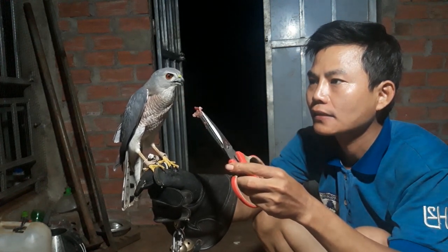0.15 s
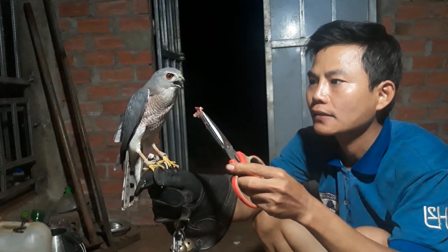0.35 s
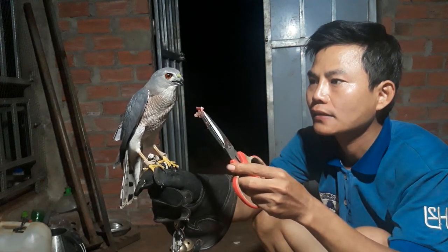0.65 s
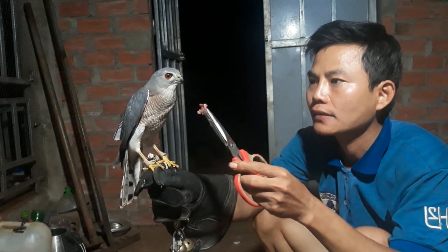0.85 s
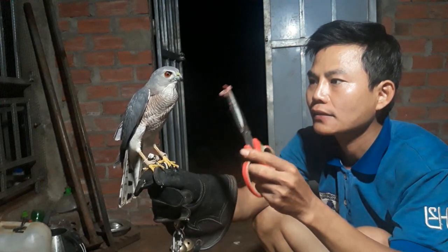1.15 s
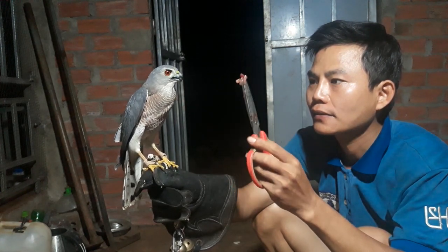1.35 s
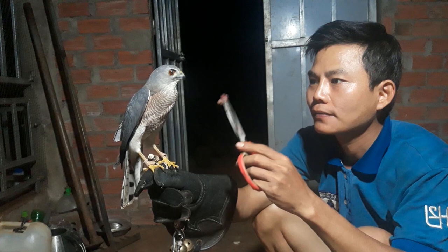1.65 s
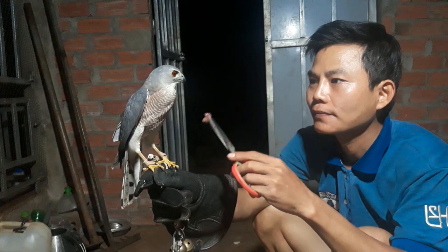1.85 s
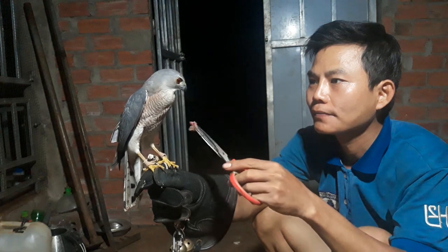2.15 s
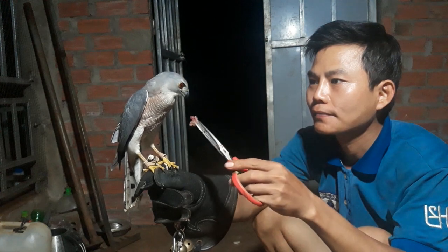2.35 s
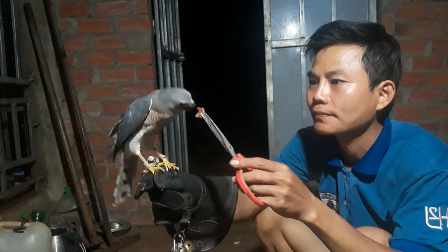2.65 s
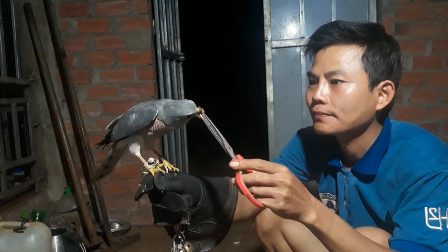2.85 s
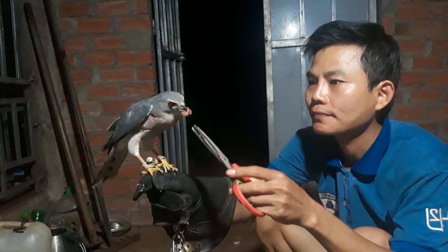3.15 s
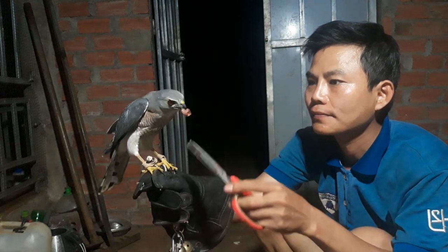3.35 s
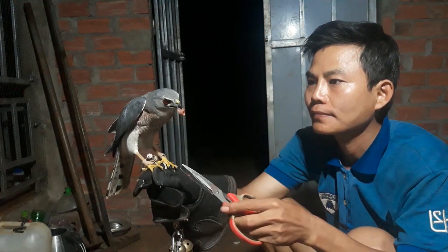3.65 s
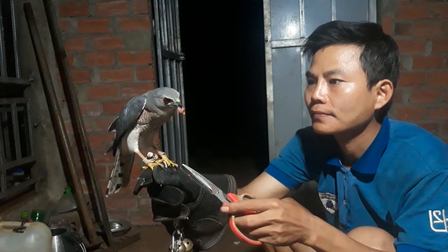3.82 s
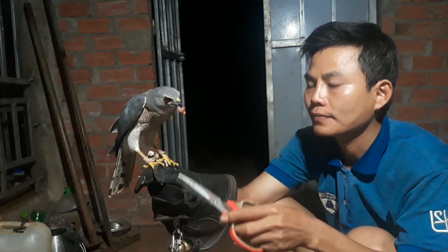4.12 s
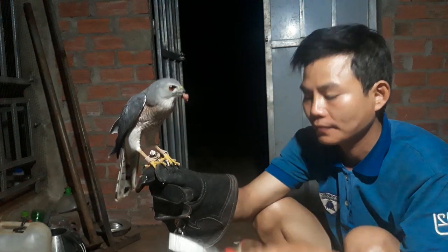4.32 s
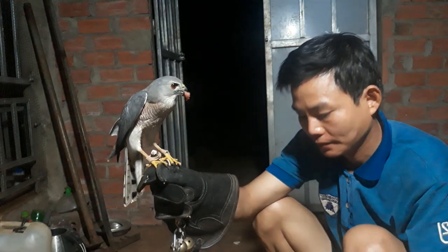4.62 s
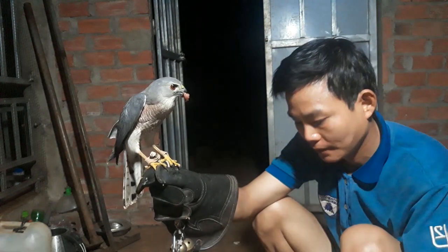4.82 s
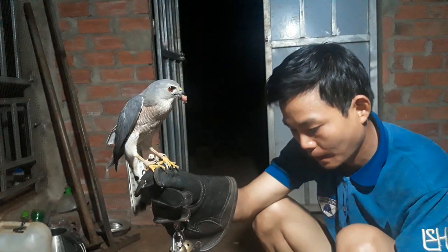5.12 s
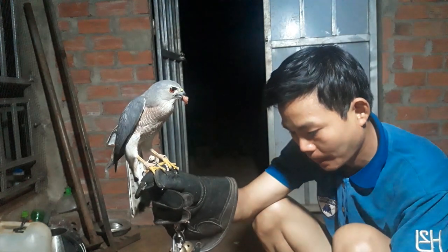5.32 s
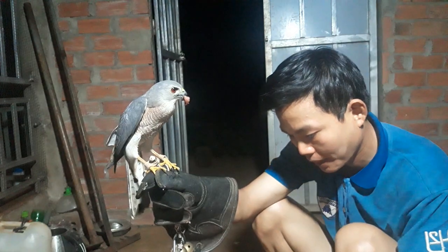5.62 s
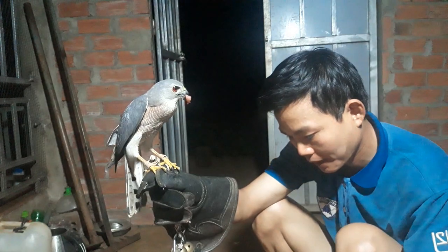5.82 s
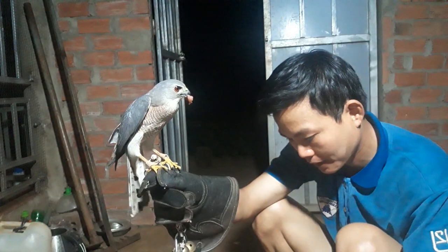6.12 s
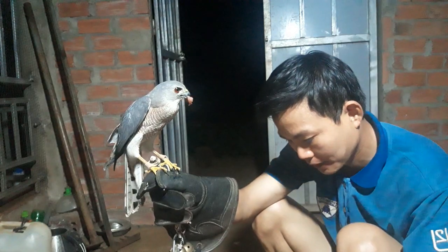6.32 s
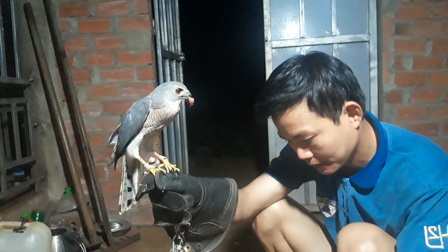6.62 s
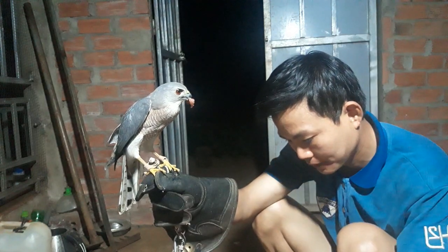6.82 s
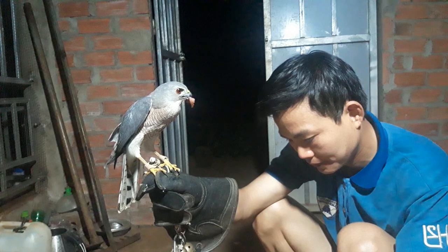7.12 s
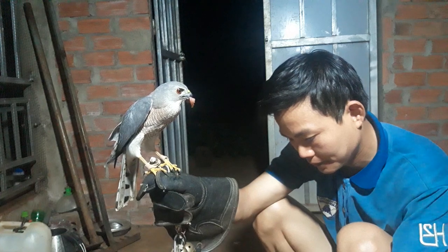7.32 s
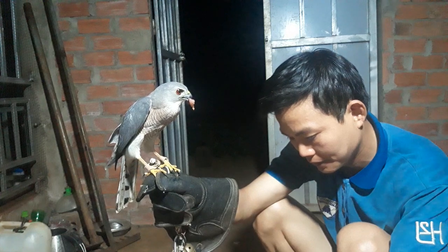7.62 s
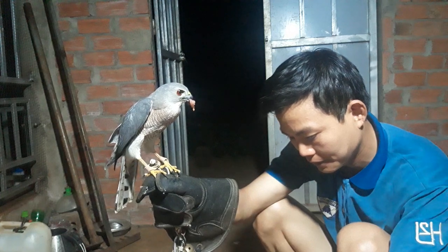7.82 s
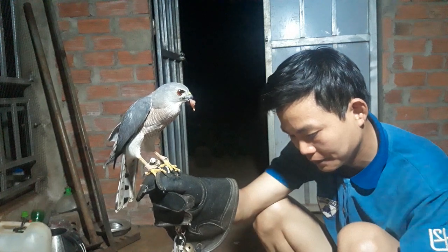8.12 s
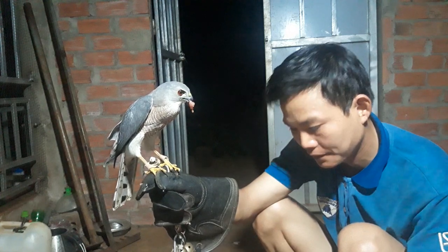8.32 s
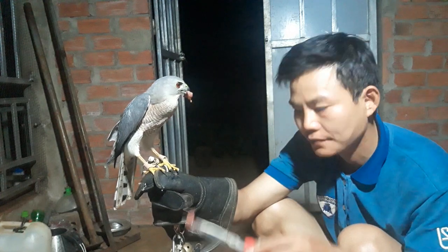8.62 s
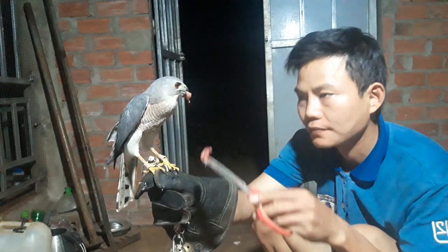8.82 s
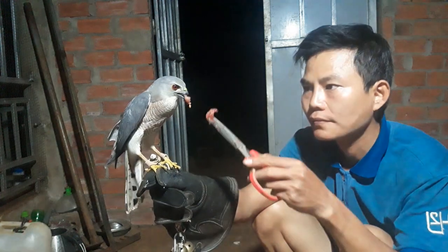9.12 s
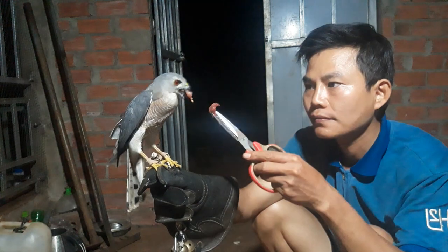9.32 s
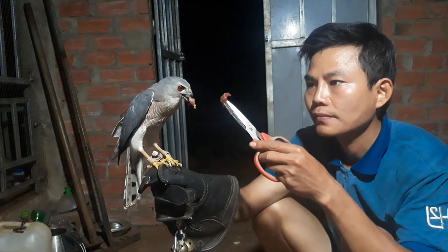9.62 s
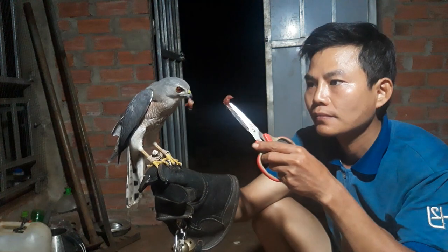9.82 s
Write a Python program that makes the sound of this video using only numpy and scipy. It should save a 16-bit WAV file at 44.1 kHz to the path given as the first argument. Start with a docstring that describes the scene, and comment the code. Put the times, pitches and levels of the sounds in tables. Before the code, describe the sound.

Crickets pulse and trill steadily in a brick-walled yard at night. Feathers and cloth rustle faintly, with a few tiny taps. About four seconds in, a small hawk squeals once, a hoarse note breaking into a clear whistle and a falling rasp. Scissors then clack several times against a dish, which rings briefly, before only insects and light rustles remain. The sound is nearly mono, with a short wall echo.

```python
"""A night yard between brick walls. Throughout, crickets rub their wings: a chorus pulses in step,
a lower trill comes in bouts and bush crickets rasp. Feathers and cloth rustle as a small hawk is
fed with scissors. At 4 s the bird squeals once: a hoarse note, a clear whistle, a falling rasp.
From 5.3 to 7.3 s the scissors clack against a dish on the ground, each clack ringing in the yard;
then only insects and light rustles are left."""
import sys
import numpy as np
from scipy import signal
from scipy.fft import rfft, irfft, next_fast_len
from scipy.io import wavfile

SR = 44100
rng = np.random.default_rng(int(sys.argv[2]) if len(sys.argv) > 2 else 0)


def to_wav(sig):
    """Store sig (one row per channel, or 1-D mono) as 16-bit WAV at the path in sys.argv[1].

    Samples outside -1..1 are clipped; the rate is SR.
    """
    pcm = np.clip(np.atleast_2d(sig), -1, 1) * 32767
    pcm = np.round(pcm).astype(np.int16)
    wavfile.write(sys.argv[1], SR, pcm.T)  # frames by channels


N = 439236
TIME = np.arange(N) / SR


def from_db(db):
    """Decibels to gain."""
    return 10 ** (np.asarray(db) / 20)


def rms_one(x):
    """Scale to unit power."""
    return x / np.sqrt(np.mean(x ** 2) + 1e-20)


def in_time(rows):
    """One automation lane per column, its points joined by straight lines."""
    times, *columns = np.transpose(rows)
    return [np.interp(TIME, np.sort(times), column) for column in columns]


def at_hz(points, hz):
    """Read a curve on a log-frequency axis."""
    freqs, values = np.transpose(points)
    return np.interp(np.log(np.maximum(hz, 1)), np.log(freqs), values)


def noise(spectrum):
    """Unit-power noise shaped by an EQ curve, rolled off beyond its ends."""
    size = next_fast_len(N, True)
    hz = np.fft.rfftfreq(size, 1 / SR) + 1
    roll_off = np.minimum(hz / spectrum[0][0], 1) ** 2 * np.minimum(spectrum[-1][0] / hz, 1) ** 4
    shaped = rfft(rng.standard_normal(size)) * from_db(at_hz(spectrum, hz)) * roll_off
    return rms_one(irfft(shaped, size)[:N])


def band(x, low_hz, high_hz):
    """Band-pass."""
    high_hz = min(max(high_hz, low_hz * 1.01), .45 * SR)
    return signal.sosfilt(signal.butter(2, [low_hz, high_hz], "band", fs=SR, output="sos"), x)


def coloured(x, spectrum, size=4096):
    """Minimum-phase EQ that keeps attacks sharp; unit power gain for white noise."""
    gain = from_db(at_hz(spectrum, np.fft.rfftfreq(size, 1 / SR)))
    cepstrum = irfft(np.log(gain))[:size // 2]
    response = irfft(np.exp(2 * rfft(cepstrum, size)))
    return signal.fftconvolve(x, response / np.sqrt(np.sum(response ** 2)))[:len(x)]


def drift(rate):
    """Random modulator with `rate` points a second and unit power."""
    return rms_one(np.interp(TIME * rate, np.arange(N // 8), rng.standard_normal(N // 8)))


def swell(start, length):
    """An envelope that rises quickly and falls away."""
    u = np.clip((TIME - start) / length, 0, 1)
    return np.sqrt(16 * u * (1 - u) ** 2 * (1 + u) / 3)


def hump(peak_s, rise_s, fall_s):
    """A bell-shaped rise to 1 and fall back."""
    distance = (TIME - peak_s) / np.where(TIME < peak_s, rise_s, fall_s)
    return np.exp(-.5 * np.minimum(distance ** 2, 100))


def bouts(rows, rise_s, fall_s, rest_db):
    """Envelope of insects that sing in bouts over a resting level."""
    power = sum((from_db(db) * hump(s, rise_s, fall_s)) ** 2 for s, db in rows)
    return np.sqrt(from_db(rest_db) ** 2 + power)


# reverb of the brick walls: (frequency [Hz], time to fall 60 dB [s])
WALL_DECAY = [(100, 0.27), (1000, 0.34), (4000, 0.41), (9000, 0.33), (16000, 0.22)]
def yard(x, direct):
    """The straight path holds the `direct` share of the power; the walls return the rest."""
    t = np.arange(SR * 3 // 4) / SR
    edges = np.geomspace(60, 19000, 9)
    tail = 0
    for low, high in zip(edges, edges[1:]):
        t60 = at_hz(WALL_DECAY, np.sqrt(low * high))
        tail += band(rng.standard_normal(len(t)), low, high) * from_db(-60 * t / t60)
    tail *= t > .002   # pre-delay
    wet_gain = np.sqrt((1 - direct) / np.sum(tail ** 2))
    return np.sqrt(direct) * x + wet_gain * signal.fftconvolve(x, tail)[:N]


# noise floor: (frequency [Hz], EQ [dB])
MIC_EQ = [(25, 3), (100, 5.5), (250, 0.5), (1000, -2.5), (2200, -13), (4400, -20.5), (6500, -2.5),
          (15500, -7)]
def mic_hiss(level_db=-86):
    """The microphones' own faint noise."""
    return from_db(level_db) * noise(MIC_EQ)


# ambience bed: (frequency [Hz], EQ [dB])
AIR_EQ = [(20, -15), (45, -10), (80, 1), (115, 2.5), (190, -5), (280, -10), (600, -13.5), (1200, -17),
          (2600, -19), (6000, -17), (9500, -31), (15500, -16.5)]
def night_air(level_db=-69.5):
    """Still air: a soft, low hush."""
    return from_db(level_db) * noise(AIR_EQ)


# far bush crickets: (frequency [Hz], EQ [dB])
SIZZLE_EQ = [(4800, -4), (5500, 2.5), (6500, -6.5), (7400, -4), (8300, 2), (8800, -1.5), (9300, -16),
             (10500, -38)]
# their bouts: (peak time [s], level before trim [dB])
SIZZLE_SWELLS = [(.08, -71.5), (.87, -73), (1.83, -73.5), (2.78, -72), (3.58, -68.5), (4.4, -68),
                 (5.22, -72), (6.08, -71.5), (6.86, -85), (7.62, -73.5), (8.22, -69), (9.17, -71),
                 (9.66, -70.5)]
def far_bush_crickets(trim_db=2):
    """Distant toothed wings blur into waves of sizzle."""
    envelope = bouts(SIZZLE_SWELLS, rise_s=.15, fall_s=.16, rest_db=-80.5)
    return from_db(trim_db) * envelope * noise(SIZZLE_EQ)


# low trill: (frequency [Hz], EQ [dB])
TRILL_EQ = [(2600, -53.5), (2950, -11.5), (3150, -3), (3350, 4.5), (3520, 4), (3700, -7), (4000, -16)]
# its bouts: (peak time [s], level before trim [dB])
TRILL_SWELLS = [(.14, -67.5), (1.25, -64.5), (2.55, -65), (3.9, -63), (5.2, -64.5), (6.52, -64),
                (7.78, -65.5), (9.2, -81.5), (9.87, -64)]
def low_trill(trim_db=2, flutter_db=1):
    """Far crickets with a lower wing tone, their strokes blurred to a flutter."""
    envelope = bouts(TRILL_SWELLS, rise_s=.26, fall_s=.22, rest_db=-67)
    wings = rms_one(noise(TRILL_EQ) * from_db(flutter_db * drift(160)))
    return from_db(trim_db) * envelope * wings


# tick cues: (start [s], length [s], level [dB])
TICK_CUES = [(3.492, 0.044, -64), (3.67, 0.086, -58), (8.18, 0.064, -62), (8.27, 0.028, -61),
             (8.53, 0.027, -55), (8.575, .05, -67), (8.664, 0.025, -55.5)]
def insect_ticks(pitch_hz=13950, wander_hz=80):
    """A tiny insect ticks at the edge of hearing."""
    tone = np.sqrt(2) * np.sin(2 * np.pi * np.cumsum(pitch_hz + wander_hz * drift(500)) / SR)
    return sum(from_db(db) * swell(s, length) for s, length, db in TICK_CUES) * tone


# rasp cues: (start [s], length [s], level [dB])
RASP_CUES = [(0.494, 0.13, -64.5), (1.135, 0.48, -66), (5.58, 0.19, -72), (7.936, 0.11, -66),
             (8.954, 0.1, -63.5), (9.45, 0.13, -62.5)]
# their colour: (frequency [Hz], EQ [dB])
RASP_EQ = [(4000, -33), (5500, -3.5), (8200, -1), (9500, -10.5), (11000, -14.5), (12800, -8), (14000, -26)]
def near_bush_cricket(grain_db=2):
    """Toothed wings scrape out broad, grainy rasps."""
    envelope = sum(from_db(db) * swell(s, length) for s, length, db in RASP_CUES)
    return envelope * noise(RASP_EQ) * from_db(grain_db * drift(300))


# near crickets: (wing tone [Hz], level before fader [dB], stroke rate [1/s], lag behind the beat [s])
CRICKET_VOICES = [(4164, -67.5, 29, .04), (4340, -67, 47, .04), (4423, -62.5, 33, -0.017),
                  (4650, -64.5, 44, 0.022), (4790, -64.5, 61, -.005), (4920, -60.5, 44, -0.052)]
# far crowd: (frequency [Hz], EQ [dB])
CROWD_EQ = [(2700, -31), (3750, -19.5), (4000, -6.5), (4250, 2), (4550, 6), (4800, 3.5), (4970, -5.5),
            (5080, -10.5), (5500, -18.5), (6400, -23.5), (8000, -67)]
# chorus automation; a negative throb is off the beat: (time [s], fader [dB], crowd throb [dB])
CHORUS_RIDE = [(0, -2.5, 2), (.95, -3, 0.5), (1.25, -1.1, 1), (2.8, -1.1, 1), (3.4, -0.9, -1),
               (5.2, -1, -0.5), (6.5, -0.8, 1), (9.96, -1, 1.5)]
# drag of the common beat behind a steady tempo: (time [s], lag [s])
BEAT_DRAG = [(0, .12), (.8, 0.12), (1.4, .15), (3.2, 0.22), (4.2, 0.14), (5.1, 0.068), (7.2, 0.12),
             (8.6, 0.1), (9.6, 0.13)]
def cricket_chorus(beat_s=.22, chirp_s=.051, lead_s=.0072, stray_s=.007, sag_hz=130, wander_hz=45,
                   uneven_db=1, crowd_db=-56):
    """Each cricket chirps near the common beat: a run of wing strokes, each sagging in pitch."""
    clock = TIME - in_time(BEAT_DRAG)[0]
    near = 0
    for hz, db, stroke_rate, lag in CRICKET_VOICES:
        own_clock = clock + lead_s - lag + stray_s * drift(3.3)
        off_beat = (own_clock + beat_s / 2) % beat_s - beat_s / 2
        chirps = from_db(uneven_db * drift(6.5)) * np.exp(-.5 * (off_beat / chirp_s) ** 2)
        stroke = np.cumsum(stroke_rate * (1 + .06 * drift(8))) / SR % 1
        pitch = hz + sag_hz * (.5 - stroke) + wander_hz * drift(90)
        wings = np.sin(np.pi * stroke) ** 2 * np.sin(2 * np.pi * np.cumsum(pitch) / SR)
        near += from_db(db) * chirps * rms_one(wings)
    fader_db, throb_db = in_time(CHORUS_RIDE)
    crowd = from_db(crowd_db + throb_db * np.cos(2 * np.pi * clock / beat_s)) * noise(CROWD_EQ)
    return from_db(fader_db) * (yard(near, direct=.49) + crowd)


# bright swishes of feathers and sleeves: (start [s], length [s], low cut [Hz], level [dB])
SWISH_CUES = [(1.192, 0.086, 5000, -62), (1.324, 0.13, 2500, -62), (2.148, 0.33, 13900, -67.5),
              (2.346, 0.1, 5100, -56.5), (3.163, 0.16, 7650, -58), (3.685, 0.037, 5030, -49.5),
              (4.067, 0.17, 10900, -62), (4.869, .15, 6200, -58.5), (5.796, .085, 8200, -58.5),
              (6.678, 0.047, 10000, -56), (7.57, 0.073, 8200, -56.5), (8.113, 0.15, 7000, -68),
              (8.459, 0.041, 4500, -55.5), (8.502, 0.16, 5950, -55.5), (9.117, 0.14, 6500, -71)]
# dull scuffs of glove and clothes: (start [s], length [s], centre [Hz], width [octaves], level [dB])
SCUFF_CUES = [(0.645, 0.055, 1020, 0.71, -70), (1.198, 0.25, 900, 2.6, -72.5),
              (1.33, 0.069, 1300, 1.7, -66), (1.373, 0.033, 1120, 1.25, -53),
              (1.346, 0.096, 186, 0.7, -58.5), (1.366, 0.3, 90, 1.7, -65), (2.386, .068, 195, 0.74, -64),
              (2.847, 0.017, 920, 1.2, -68), (3.233, 0.074, 1200, 3.3, -69.5),
              (3.44, .053, 2620, 0.71, -61.5), (3.727, .03, 1690, 0.38, -56.5),
              (4.496, 0.052, 450, 0.28, -69.5), (4.937, 0.1, 1020, 0.49, -71.5),
              (8.166, 0.2, 1700, 1.5, -73), (8.317, 0.061, 1650, 0.34, -62),
              (8.349, 0.11, 3000, 1.63, -57.5)]
# small taps of beak and blades: (start [s], length [s], centre [Hz], width [octaves], level [dB])
TAP_CUES = [(0.149, .012, 7740, 0.5, -55.5), (2.754, 0.013, 3280, 2.5, -59.5),
            (3.106, 0.0066, 3820, 0.12, -48), (9.2425, .0015, 5000, 3, -52.5),
            (9.656, 0.0047, 6800, 1.2, -53)]
def rustles(grain_db=3, swish_top_hz=17600):
    """Feeding foley in grainy noise: feathers and cloth rub, beak and blades give drier taps."""
    grains = rms_one(rng.standard_normal(N) * from_db(grain_db * drift(400)))

    def stroke(s, length, low_hz, high_hz, db):
        """One swell of grains in a band."""
        out = np.zeros(N)
        span = slice(int(s * SR), int((s + length) * SR))
        out[span] = from_db(db) * rms_one(band(grains[span], low_hz, high_hz))
        return out * swell(s, length)

    def centred(cues):
        """Strokes whose bands are set by centre and width."""
        return sum(stroke(s, length, hz / 2 ** (width / 2), hz * 2 ** (width / 2), db)
                   for s, length, hz, width, db in cues)

    swishes = sum(stroke(s, length, low_hz, swish_top_hz, db) for s, length, low_hz, db in SWISH_CUES)
    return yard(swishes + centred(SCUFF_CUES), direct=.15) + yard(centred(TAP_CUES), direct=.69)


def squeal_hiss(level_db=-45):
    """The puff of hiss that opens the squeal."""
    eq = [(4200, -23), (5500, 6), (6500, 2), (8500, 0), (10000, -18.5), (13000, -23)]   # [Hz], [dB]
    return from_db(level_db) * hump(3.982, rise_s=.0063, fall_s=.033) * noise(eq)


# the squeal's three notes: (start [s], length [s], first pitch [Hz], last pitch [Hz],
# glide lateness [exponent], mid-note dip [Hz], level [dB], roughness [factor], overtone gain [dB])
SQUEAL_NOTES = [(3.997, .14, 2304, 2321, 1, 175, -39.5, 0.67, -0.5),
                (4.138, 0.29, 2875, 2588, 4.5, 2, -38, 0.19, -6),
                (4.425, 0.06, 2150, 1604, 1.1, 5, -45.5, 1.17, -2)]
# dry accents on the whistle's fundamental: (peak time [s], half length [s], boost [dB])
WHISTLE_ACCENTS = [(4.315, 0.012, 15), (4.418, 0.003, 3)]
def hawk_squeal(jitter=.024, shimmer_db=2, rattle_hz=115, rattle_depth=.75, dull_db=-12,
                sag_db_per_octave=7, overtone_sag_db_per_octave=58, undertone_db=-54.5):
    """A hoarse, rattling note breaks upward into a clear whistle, then drops away in a rasp."""
    attack_s, release_s = .023, .0029
    upper_harmonics = [(3, -14), (4, -12), (5, -24)]   # (harmonic, relative level [dB])
    wobble, shimmer = drift(500), drift(250)
    rattle = np.sin(2 * np.pi * np.cumsum(rattle_hz * (1 + .1506 * drift(60))) / SR)
    accent = from_db(sum(db * hump(s, half, half) for s, half, db in WHISTLE_ACCENTS))
    undertone = from_db(undertone_db) * hump(4.285, rise_s=.029, fall_s=.029)   # half pitch, mid whistle
    voice, dry_accents = np.zeros((2, N))
    for s, length, first_hz, last_hz, lateness, dip_hz, db, rough, overtone_db in SQUEAL_NOTES:
        span = slice(int(s * SR), int((s + length) * SR))
        u = np.linspace(0, 1, span.stop - span.start)
        glide_hz = first_hz + (last_hz - first_hz) * u ** lateness
        hz = glide_hz - dip_hz * np.sin(np.pi * u)
        phase = 2 * np.pi * np.cumsum(hz * (1 + jitter * rough * wobble[span])) / SR
        top = sum(from_db(level) * np.sin(k * phase) for k, level in upper_harmonics)
        top *= from_db(dull_db * rough)   # rough notes are duller
        # as the pitch sinks the voice weakens, its overtones much faster
        octaves_down = np.log2(first_hz / glide_hz)
        gain = from_db(db - sag_db_per_octave * octaves_down + shimmer_db * rough * shimmer[span])
        fade = from_db(-overtone_sag_db_per_octave * octaves_down)
        overtones = from_db(overtone_db) * fade * (np.sin(2 * phase) + fade * top)
        tone = (np.sin(phase) + overtones) * (1 + rattle_depth * rough * rattle[span])
        envelope = np.minimum(1, length * np.minimum(u / attack_s, (1 - u) / release_s))
        voice[span] += envelope * (gain * tone + undertone[span] * np.sin(phase / 2))
        dry_accents[span] += envelope * (accent[span] - 1) * from_db(db) * np.sin(phase)
    return yard(np.sqrt(2) * voice + squeal_hiss(), direct=.5) + dry_accents


# scissor hits, gains before trim and EQ:
# (time [s], snap [dB], knock [dB], dish [dB], knock low cut [Hz], snap high cut [Hz])
CLACK_CUES = [(5.338, -40.5, -47.5, -74, 1400, 21000), (5.347, -49.5, -48.5, -73, 1400, 19000),
              (6.030, -24.5, -27, -38, 149, 19000), (6.055, -31, -28, -31, 150, 17000),
              (6.617, -37.5, -38.5, -47.5, 170, 19000), (6.631, -35.5, -35, -64, 170, 18000),
              (6.939, -48.5, -43, -57.5, 150, 8200), (7.292, -41, -43, -51.5, 170, 9600)]
# bright snap of the blades: (frequency [Hz], EQ [dB])
SNAP_EQ = [(1500, -17), (2400, -21.5), (2900, 0.5), (3600, 2), (5500, 0.5), (8400, -2), (9600, -12.5),
           (12500, -8), (15500, -11.5)]
# body of the knock: (frequency [Hz], EQ [dB])
KNOCK_EQ = [(100, -25.5), (180, -5.5), (270, -15.5), (400, -14), (540, -12), (700, -19), (1000, -4),
            (1300, 3), (1800, -2), (2500, -6.5), (4500, -15.5)]
# ring of the dish: (frequency [Hz], relative level [dB], time to fall 60 dB [s])
DISH_MODES = [(777, -10, 0.48), (835, -13.5, 0.43), (1043.4, 2.5, 0.28), (1096, -6, 0.37),
              (1250, -18, 0.31), (1250, -8.5, 0.51), (1355, -1.5, 0.3), (1504, -5.5, 0.46),
              (1840, -6, 0.24), (3870, -20, .3)]
def scissor_clacks(snap_s=.0074, knock_s=.008, bloom_s=.031, snap_trim_db=6, knock_trim_db=3):
    """The blades snap shut and knock the dish, which rings on; a light touch has no bass."""
    snap, knock, dish = np.zeros((3, N))
    t = np.arange(SR * 3 // 4) / SR
    bloom = np.minimum(t / bloom_s, 1)
    for s, snap_db, knock_db, dish_db, low_cut_hz, high_cut_hz in CLACK_CUES:
        span = slice(round(s * SR), round(s * SR) + len(t))
        snap_burst = np.exp(-t / snap_s) * rng.standard_normal(len(t))
        knock_burst = np.exp(-t / knock_s) * rng.standard_normal(len(t))
        snap[span] += from_db(snap_db + snap_trim_db) * band(snap_burst, 1000, high_cut_hz)
        knock[span] += from_db(knock_db + knock_trim_db) * band(knock_burst, low_cut_hz, 4550)
        for (hz, db, t60), scatter_db in zip(DISH_MODES, rng.standard_normal(len(DISH_MODES))):
            decay = from_db(dish_db + db + scatter_db - 60 * t / t60)
            dish[span] += bloom * decay * np.sin(2 * np.pi * hz * t)
    return yard(coloured(snap, SNAP_EQ) + coloured(knock, KNOCK_EQ), direct=.44) + dish


def scene(width_db=-42):
    """A near-mono mix: only a faint reverberant wash of the scene and soft hiss differ between the two
    channels."""
    insects = cricket_chorus() + low_trill() + far_bush_crickets()
    insects += yard(near_bush_cricket() + insect_ticks(), direct=.44)
    centre = insects + rustles() + hawk_squeal() + scissor_clacks() + night_air()
    side = mic_hiss() + from_db(width_db) * yard(centre, direct=0)
    return np.array([centre + side, centre - side])


def record(dry):
    """A steep high cut at 15.8 kHz."""
    return signal.sosfilt(signal.ellip(12, .1, 80, 15800, fs=SR, output="sos"), dry)


dry = scene()
out = record(dry)
to_wav(out)
```